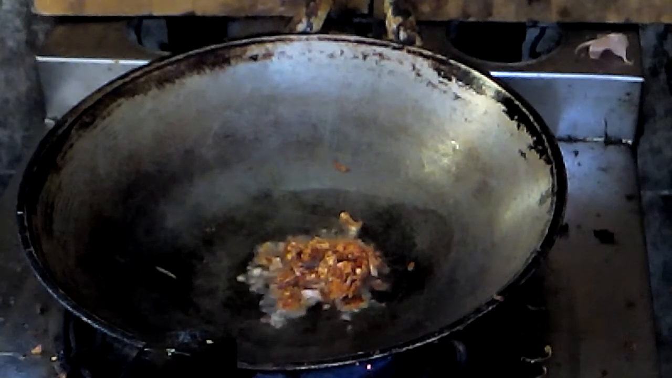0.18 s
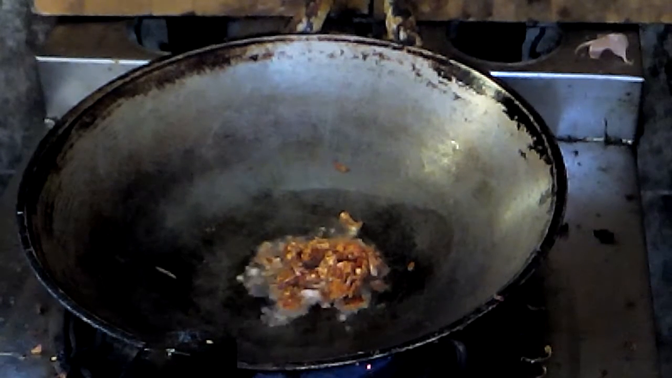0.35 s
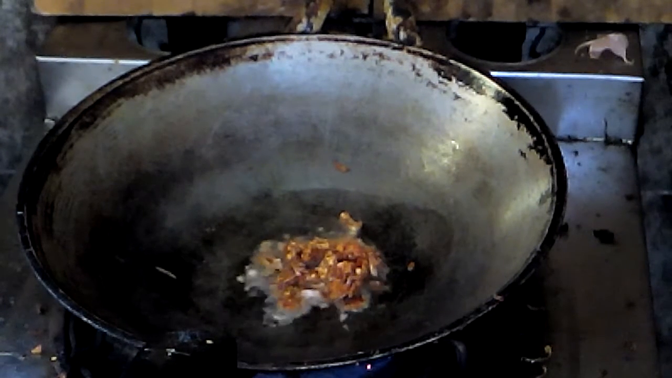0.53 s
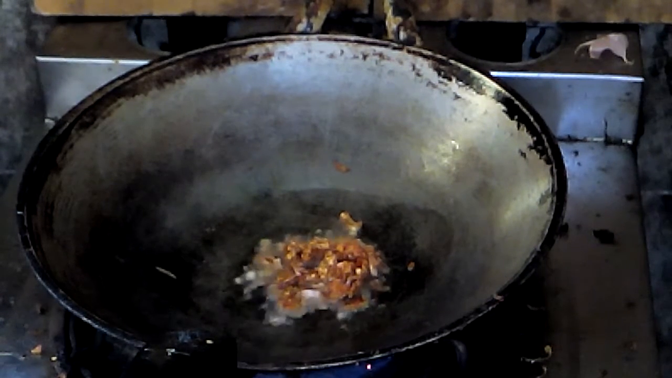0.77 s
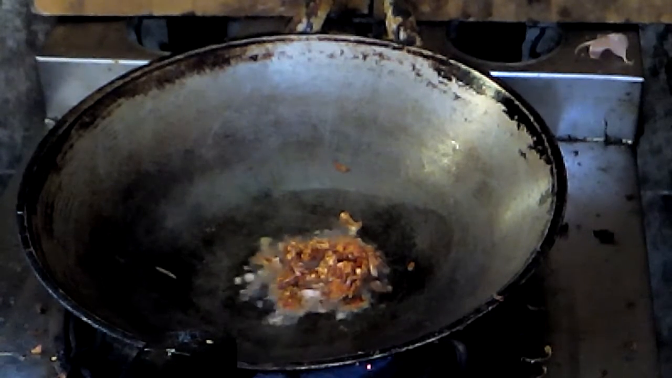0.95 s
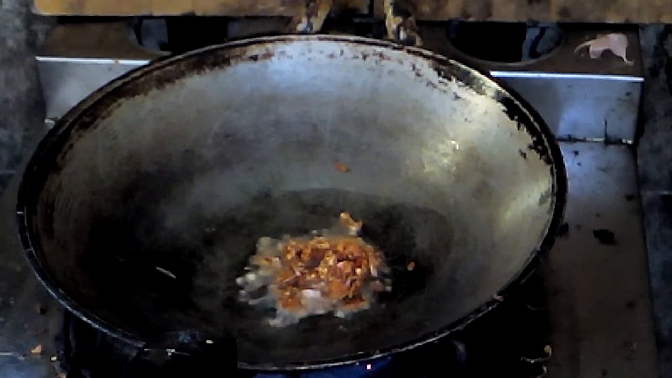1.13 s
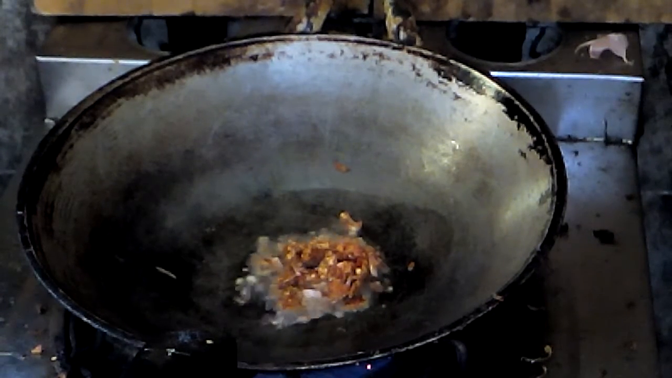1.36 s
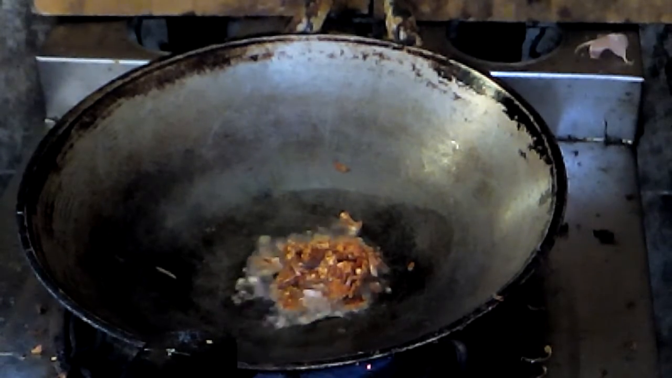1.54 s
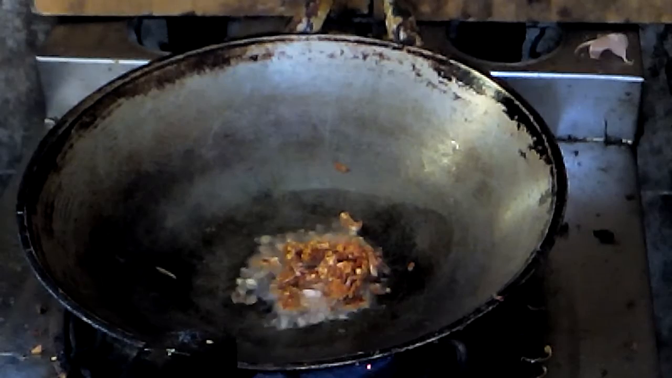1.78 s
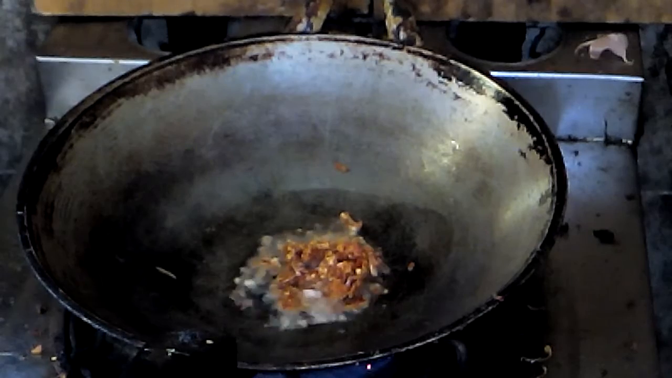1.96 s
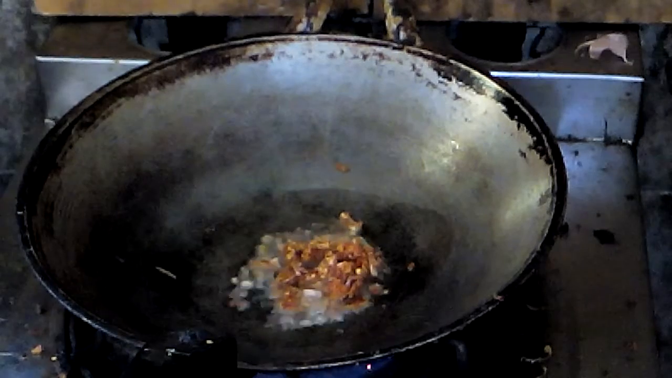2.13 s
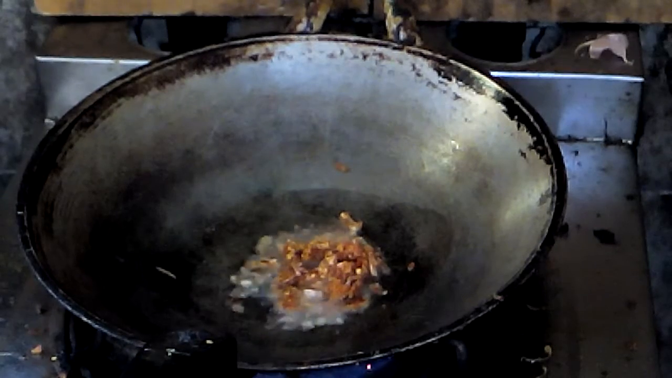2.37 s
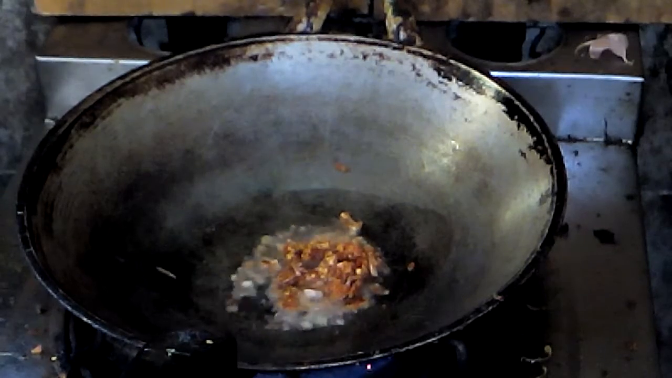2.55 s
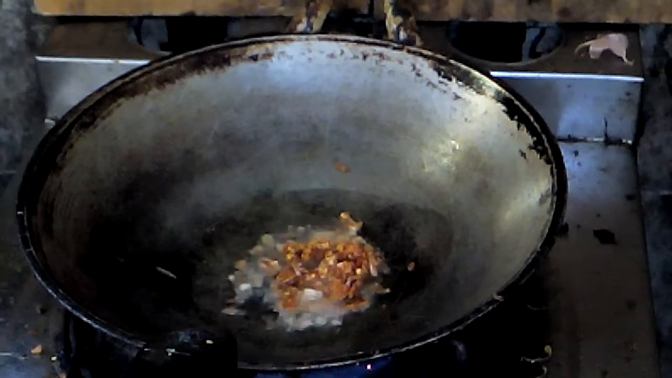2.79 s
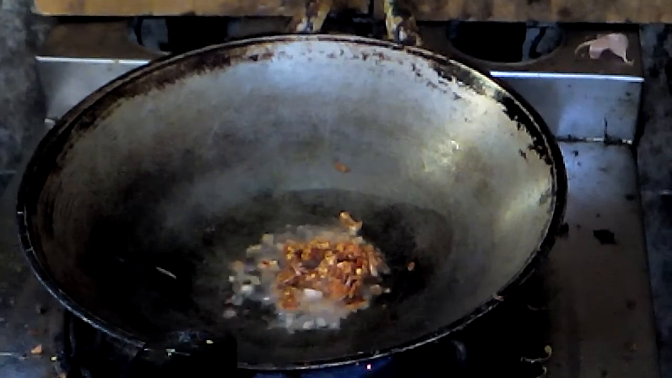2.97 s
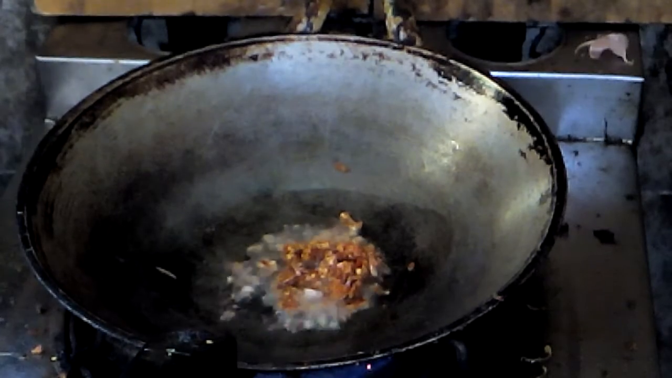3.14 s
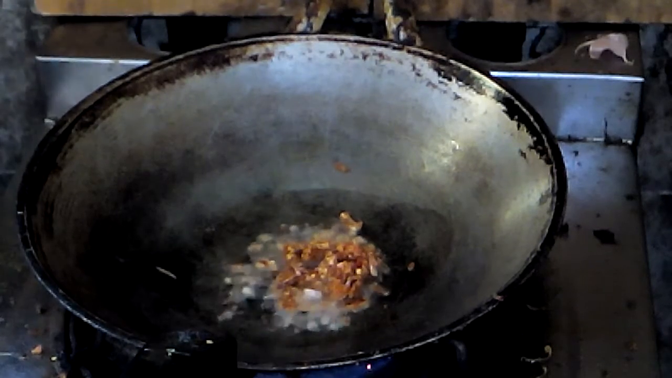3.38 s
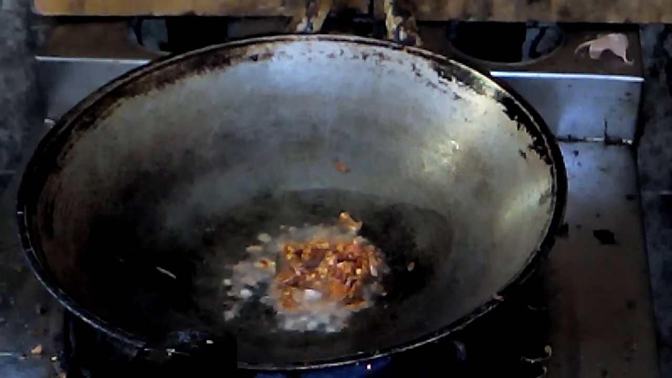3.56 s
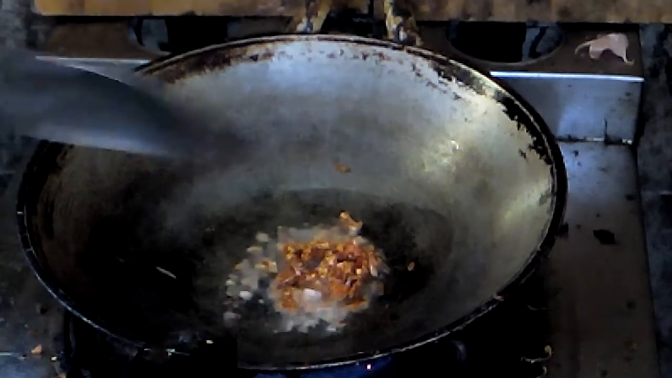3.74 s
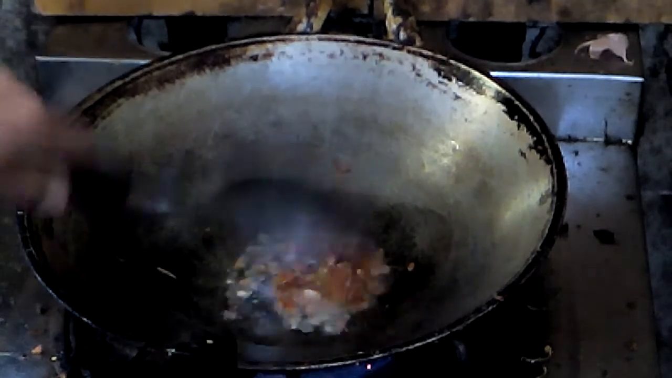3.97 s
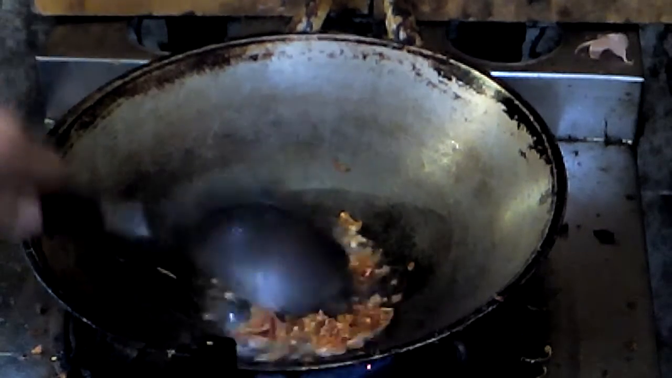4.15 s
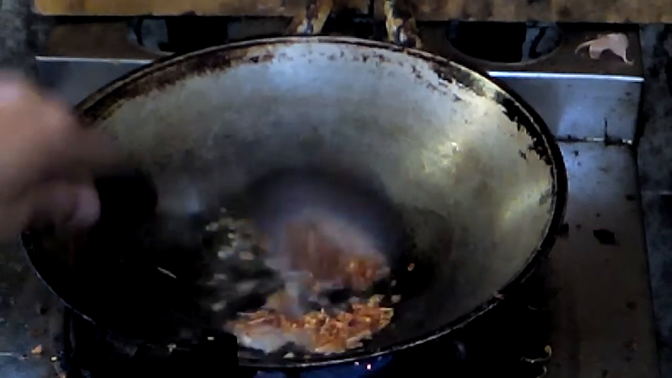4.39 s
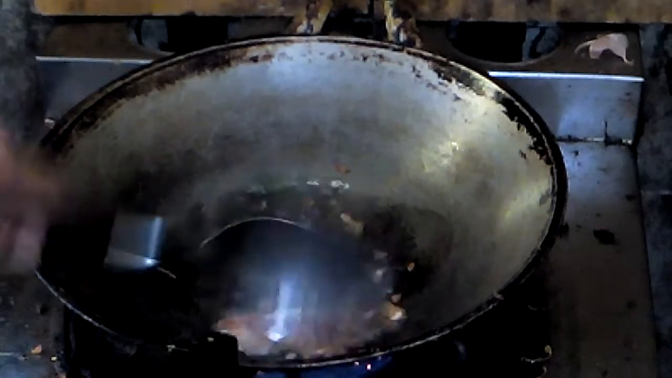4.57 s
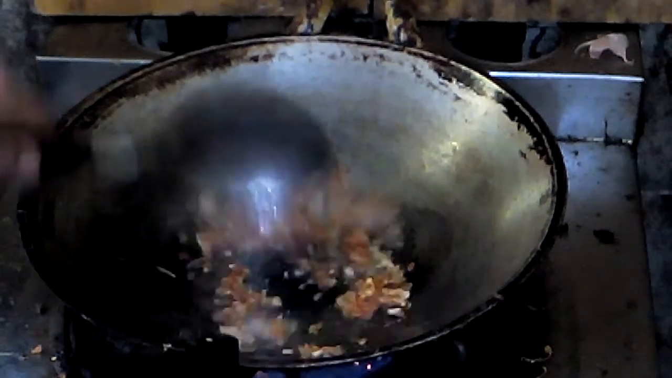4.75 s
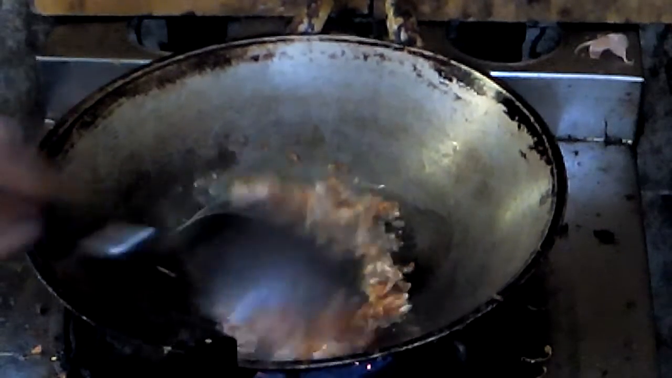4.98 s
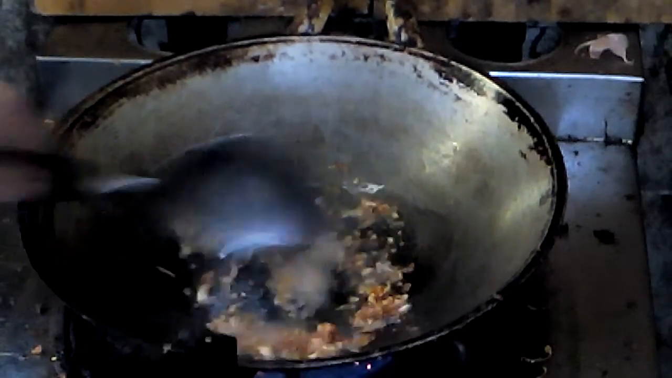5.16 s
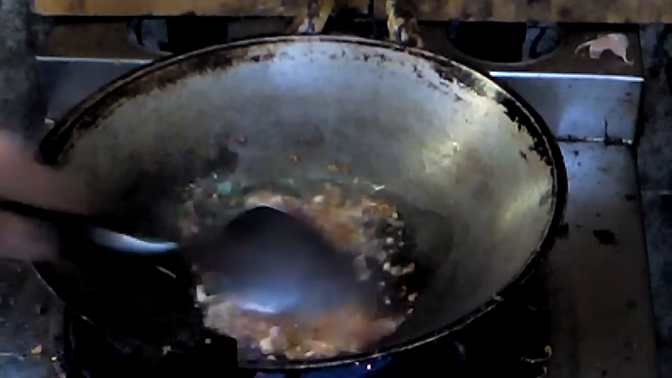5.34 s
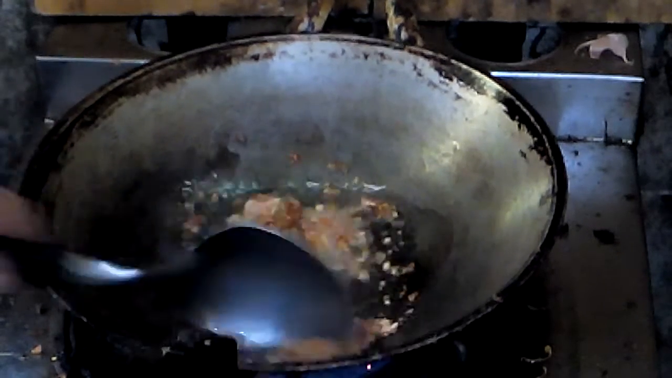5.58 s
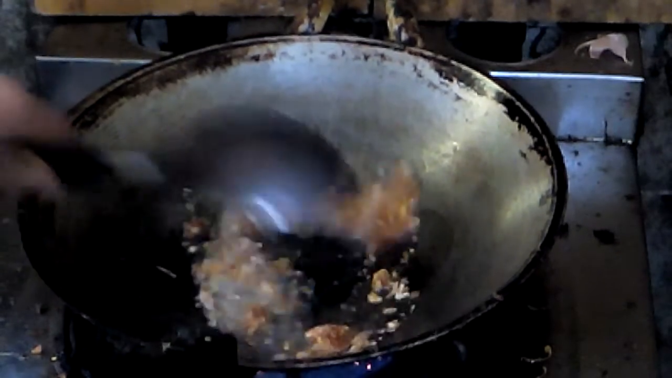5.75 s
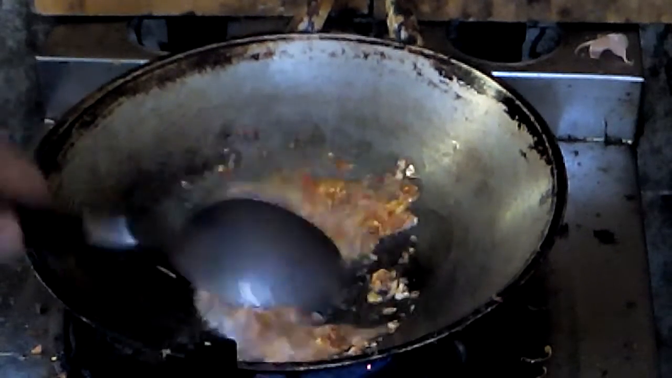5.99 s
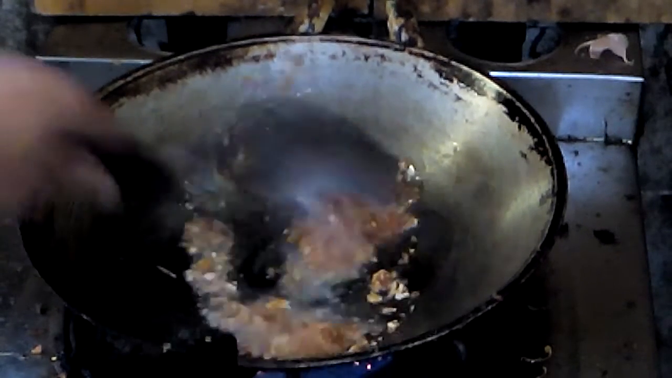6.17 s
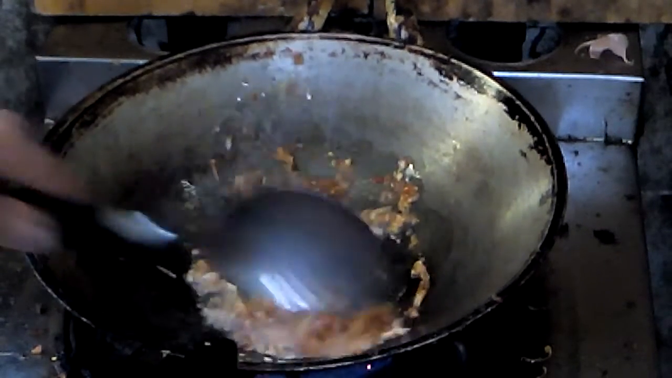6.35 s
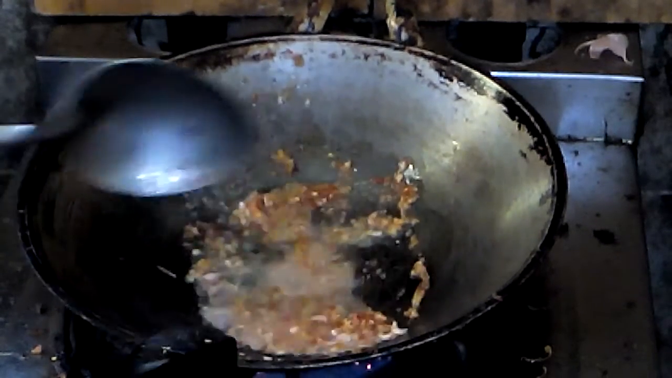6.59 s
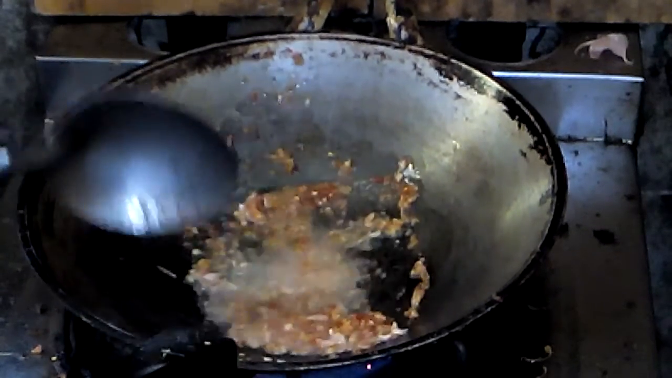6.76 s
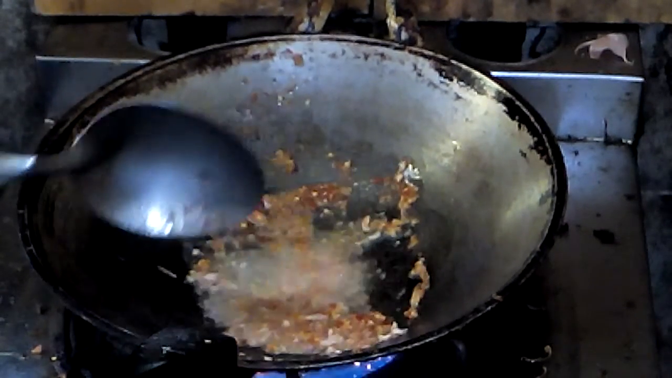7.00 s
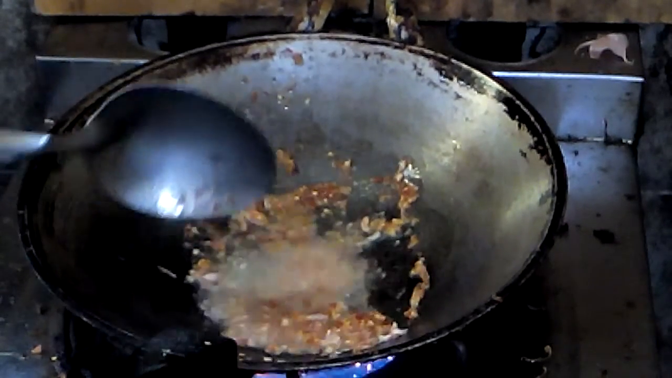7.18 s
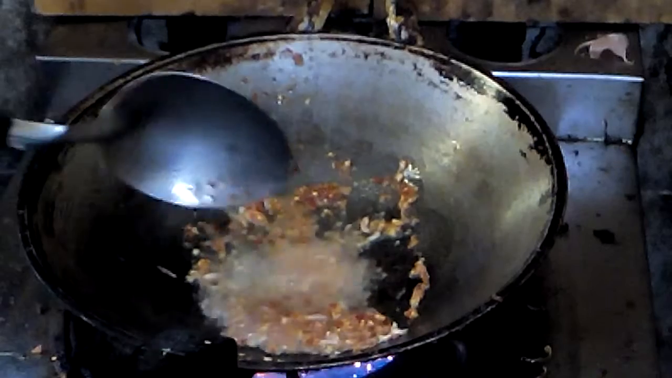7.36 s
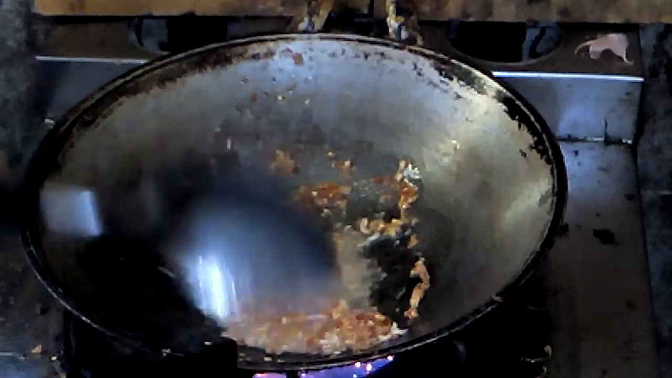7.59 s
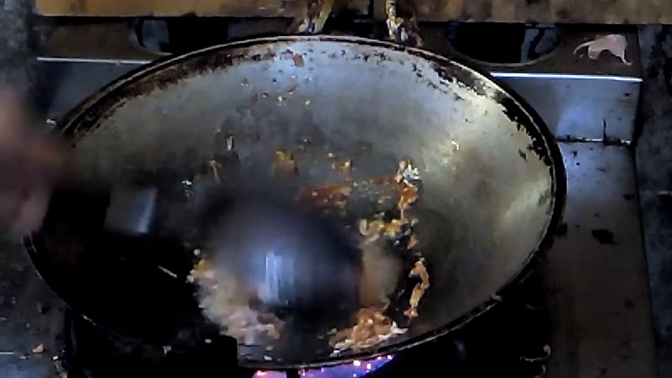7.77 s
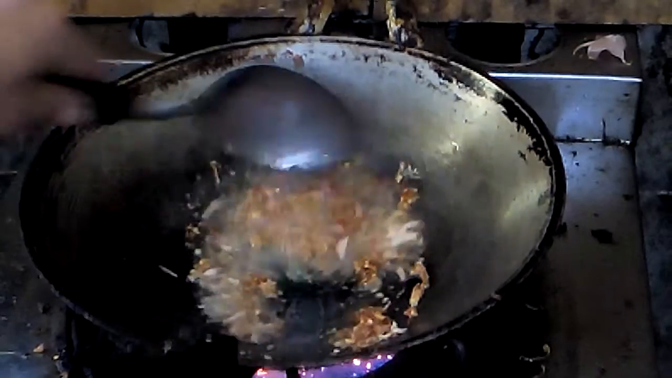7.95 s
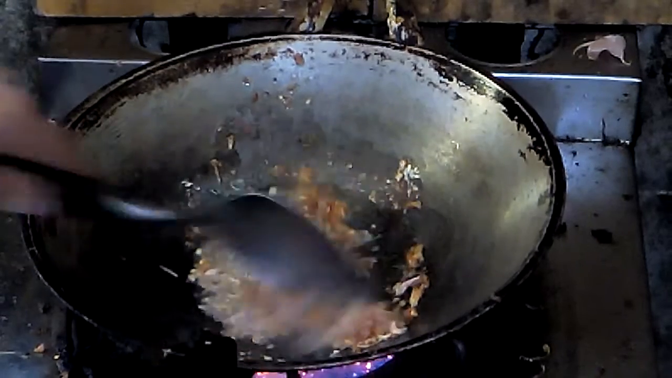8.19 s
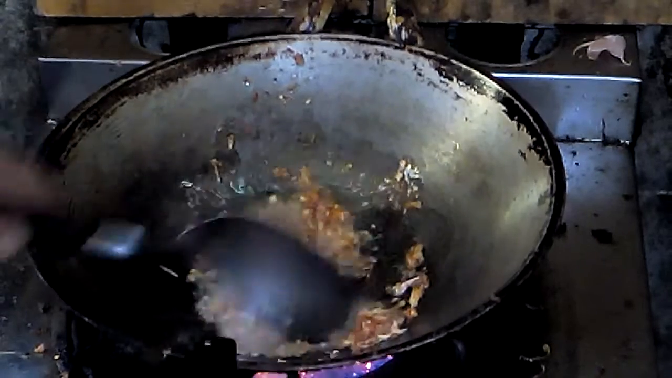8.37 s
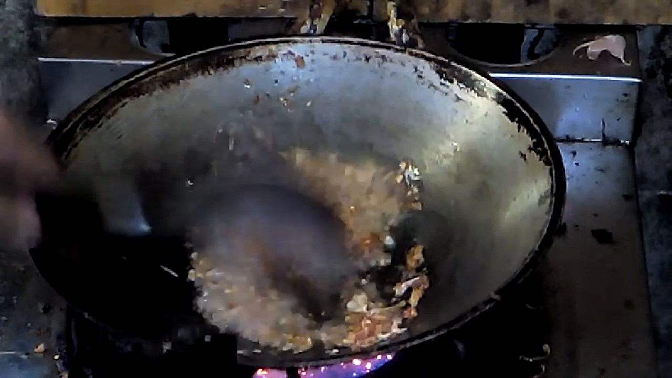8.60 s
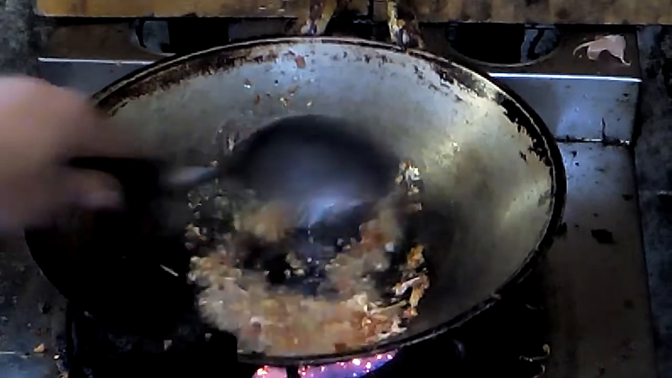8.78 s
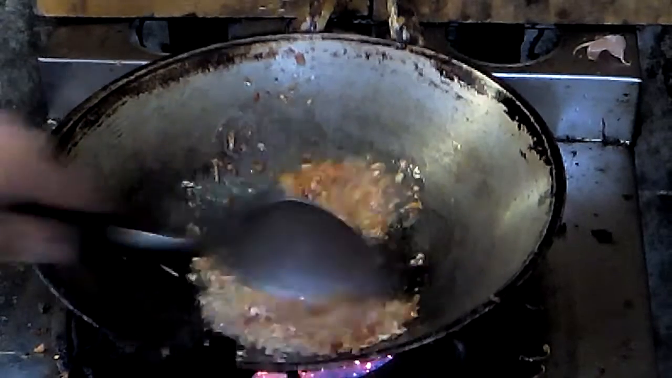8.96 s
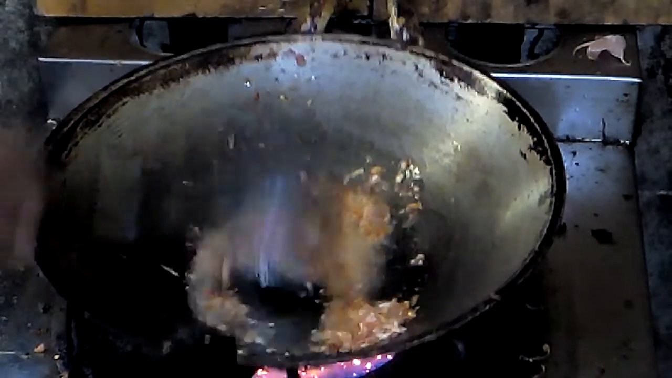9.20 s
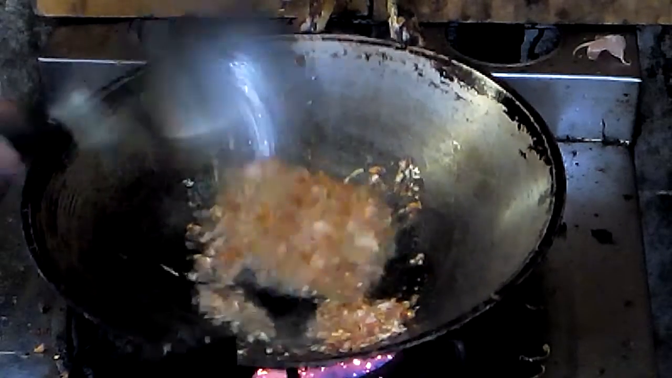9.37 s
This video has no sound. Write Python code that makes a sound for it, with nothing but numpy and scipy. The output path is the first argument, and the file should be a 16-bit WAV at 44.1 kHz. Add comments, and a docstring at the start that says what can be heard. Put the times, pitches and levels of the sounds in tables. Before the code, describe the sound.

A spoon taps and scrapes a bowl, oil sizzles softly, then a metal ladle clangs and scrapes around a steel wok as paste fries harder.

```python
"""Stirring paste in a wok

Close by, a spoon taps and scrapes a bowl, then knocks and drags on a steel wok while oil sizzles and spits.
Blows ring decaying modes over a rattle with brief wall echoes; strokes drive modes with gritty noise.
Steam bubbles are grainy noise. Burner and room give an unsteady rumble and a wavering drone in narrow
bands; far knocks are noise bursts, and rustles are faint broad swells."""
import sys
import numpy as np
from scipy import signal
from scipy.fft import rfft, irfft, next_fast_len
from scipy.io import wavfile
from scipy.ndimage import map_coordinates

SR = 44100
rng = np.random.default_rng(int(sys.argv[2]) if len(sys.argv) > 2 else 0)


def master(y):
    """Save y as 16-bit WAV."""
    cut = np.clip(np.atleast_2d(y).T, -1, 1)
    pcm = np.round(cut * 32767)  # scale
    wavfile.write(sys.argv[1], SR, pcm.astype(np.int16))


N = 415863
STEP = 64  # samples between control values


def amp(db):
    """Gain of a dB value."""
    return 10 ** (np.asarray(db) / 20)


def unit(x):
    """x at rms 1."""
    return x / np.sqrt(np.mean(x ** 2) + 1e-20)


def along(points, hz):
    """Value at hz from (Hz, value) points on a log axis."""
    point_hz, values = np.transpose(points)
    return np.interp(np.log(hz + 1), np.log(point_hz + 1), values)


def curve(points):
    """(s, value) points, one value per sample."""
    return np.interp(np.arange(N) / SR, *np.transpose(points))


def wobble(rate_hz):
    """Smooth random curve with rate_hz knots a second."""
    knots = rng.standard_normal(int(N * rate_hz / SR) + 4)
    positions = np.arange(0, N + STEP, STEP) * rate_hz / SR
    return map_coordinates(knots, [positions]).repeat(STEP)[:N]


def filtered(x, response):
    """x times a response of frequency."""
    size = next_fast_len(len(x) + 8192)
    return irfft(rfft(x, size) * response(np.fft.rfftfreq(size, 1 / SR)), size)[:len(x)]


def hiss(spectrum, grain_db):
    """Coloured noise of rms 1; grain_db scatters the size of its tiny impacts."""
    sizes = amp(grain_db * np.minimum(rng.exponential(size=N), 5))
    grains = rng.standard_normal(N) * sizes
    return unit(filtered(grains, lambda hz: amp(along(spectrum, hz))))


def narrow(peaks):
    """Noise of rms 1 inside narrow peaks."""
    def response(hz):
        return sum(amp(db) / (1 + ((hz - centre) / width * 2) ** 2) for centre, width, db in peaks)
    return unit(filtered(rng.standard_normal(N), response))


def dying(t60s, length):
    """Noise of energy 1 whose every frequency dies at its own speed."""
    hz, t, spectra = signal.stft(rng.standard_normal(length), SR, nperseg=128)
    decay = amp(-60 * t / along(t60s, hz)[:, None])
    tail = signal.istft(spectra * decay, SR, nperseg=128)[1][:length]
    return tail / np.linalg.norm(tail)


def swells(peaks_s, rises_s, dbs, fall_db_per_s):
    """Level in dB of each stroke (rows) per control step: it climbs 20 dB in its rise, then dies away."""
    late = np.arange(0, N + STEP, STEP) / SR - np.asarray(peaks_s)[:, None]
    climb = 20 * late / np.asarray(rises_s)[:, None]
    return np.asarray(dbs)[:, None] + np.where(late < 0, climb, -fall_db_per_s * late)


def together(levels_db):
    """Gain per sample of overlapping strokes, added by energy."""
    gain = np.sqrt((amp(levels_db) ** 2).sum(axis=0))
    return np.interp(np.arange(N), np.arange(len(gain)) * STEP, gain)


def drag(strokes, bands_db, falls, edges_hz, modes, rasp, rings_db, shift_db, favour_db_per_octave, rate_hz):
    """Grit under the spoon drives each mode; the moving contact favours now one mode, now another."""
    peaks, rises, *_, lower, upper = np.transpose(strokes)
    loudest = swells(peaks, rises, np.max(bands_db, axis=0), falls[0]).argmax(axis=0)
    favoured_hz = np.array([lower[loudest], upper[loudest]])
    grit = hiss(rasp, grain_db=1.5) * amp(1.2 * wobble(40))
    out = np.zeros(N)
    for db, fall, ring_db, lo, hi in zip(bands_db, falls, rings_db, edges_hz, edges_hz[1:]):
        broad = unit(filtered(grit, lambda hz: (hz >= lo) & (hz < hi)))
        gains, tones = [], []
        for hz, width_hz, level_db in modes:
            if not lo <= hz < hi:
                continue
            octaves = np.abs(np.log2(favoured_hz / hz)).min(axis=0)
            off = np.minimum(octaves, .2).repeat(STEP)[:N]
            gains.append(amp(level_db - favour_db_per_octave * off + shift_db * wobble(rate_hz)))
            resonator = signal.iirpeak(hz, hz / width_hz, SR)
            tones.append(unit(signal.lfilter(*resonator, rng.standard_normal(N))))
        total = np.sqrt(sum(g ** 2 for g in gains))  # the contact shares out a fixed energy
        rings = sum(tone * g for tone, g in zip(tones, gains))
        texture = unit(broad + amp(ring_db) * rings / total)
        out += together(swells(peaks, rises, db, fall)) * texture
    return out


def minimum_phase(colour):
    """Causal impulse response of (Hz, dB) points, by folding the cepstrum."""
    size = 8192
    cepstrum = irfft(np.log(amp(along(colour, np.fft.rfftfreq(size, 1 / SR)))))
    fold = np.r_[1, np.full(size // 2 - 1, 2), 1, np.zeros(size // 2 - 1)]
    return irfft(np.exp(rfft(cepstrum * fold)))[:size // 4]


def strike(events, high_db, high_per_low, modes, rattle_db, crack_db, crack_t60_s, gain_db):
    """Each blow rings the modes at new strengths, over a dense rattle of unresolved modes and wall echoes."""
    # rattle and wall decay before the spoon's damping: (frequency [Hz], t60 [s])
    walls = [(150, 1), (600, 0.37), (2500, 0.45), (8000, 0.34)]
    # centres of the colour bands, lows to highs: (frequency [Hz])
    bands_hz = [500, 1250, 2800, 6200]
    travel_s = .002  # steel to microphone
    out, t = np.zeros(N + SR), np.arange(SR // 2) / SR
    for s, db, share, favoured_hz, low_db, middle_db in events:
        ring = np.zeros(len(t))
        for hz, level_db, t60_s in modes:
            # the spot struck favours one mode
            near_db = 7.5 * np.exp(-(np.log2(hz / favoured_hz) / 0.038) ** 2)
            gain = amp(level_db + near_db + rng.normal(0, 3.3) - 60 * t / t60_s)
            ring += gain * np.sin(2 * np.pi * hz * t)
        rattle = amp(rattle_db) * dying(walls, len(t))
        crack = amp(crack_db - 60 * t / crack_t60_s) * rng.standard_normal(len(t))
        damping = amp(-60 * t / .2 * (1 / np.clip(share, .2, 1.5) - 1))
        blow = (ring / np.linalg.norm(ring) + rattle) * damping + crack
        bands = [low_db, 0, middle_db, middle_db + high_db + high_per_low * low_db]
        lows = [(25, low_db - 60), (80, low_db - 25), (250, low_db - 3)]
        highs = [(7500, bands[-1] - 3), (8800, bands[-1] - 24)]
        colour = [*lows, *zip(bands_hz, bands), *highs]
        blow = signal.fftconvolve(blow, minimum_phase(colour))[:len(t)]
        onset = 1 - np.exp(-t / 0.00093)
        out[round((s + travel_s) * SR):][:len(t)] += amp(db + gain_db) * blow * onset
    return out[:N]


def pips(events, spread, t60_s, gain_db):
    """Short bursts of noise about one pitch; spread is in natural-log frequency."""
    out, t = np.zeros(N + SR), np.arange(SR // 4) / SR
    for s, db, hz in events:
        noise = filtered(rng.standard_normal(len(t)), lambda f: np.exp(-(np.log((f + 1) / hz) / spread) ** 2))
        envelope = amp(db + gain_db - 60 * t / t60_s) * (1 - np.exp(-t / 0.00091))
        out[round(s * SR):][:len(t)] += envelope * unit(noise)
    return out[:N]


def bowl():
    """The spoon taps and scrapes the bowl; many minor modes crowd between the main ones."""
    # light bright strokes between pressed ones: (peak time [s], rise by 20 dB [s], low level [dB],
    # body level [dB], treble level [dB], lower favoured pitch [Hz], upper favoured pitch [Hz])
    bowl_strokes = [(0.024, 0.019, -45, -52, -36.5, 1980, 3710),
                    (0.106, 0.15, -50, -39.5, -41.5, 1260, 3500),
                    (0.135, .04, -55, -41.5, -34.5, 1990, 3680), (0.235, 0.093, -38, -19, -27, 1150, 3070),
                    (0.285, 0.12, -45, -28, -36, 1190, 2970), (0.402, 0.032, -45, -46.5, -33.5, 2020, 2870),
                    (0.531, 0.17, -46, -35, -28, 1320, 3950), (0.603, 0.077, -34.5, -19.5, -25, 1284, 3390),
                    (0.768, 0.013, -51, -50, -36.5, 1760, 3550),
                    (0.866, 0.14, -49, -41.5, -37.5, 1290, 3320), (0.928, 0.13, -46, -30, -32, 1450, 2700),
                    (0.98, 0.11, -47, -24, -34.5, 1160, 2020), (1.065, .02, -51, -43, -40.5, 1175, 3740),
                    (1.112, 0.061, -64, -45, -35.5, 2110, 2700),
                    (1.216, 0.058, -62, -49, -36.5, 1760, 3260),
                    (1.255, 0.088, -53, -45, -35.5, 1770, 3240),
                    (1.294, 0.089, -44, -32.5, -40.5, 1180, 3260),
                    (1.433, 0.01, -56, -59.5, -43.5, 1930, 3990), (1.503, 0.11, -55, -42, -37, 1560, 4180),
                    (1.57, 0.14, -57, -57, -47.5, 1500, 2800), (2.39, .03, -66, -59, -64, 1360, 4630),
                    (2.46, .1, -61, -59.5, -60, 1220, 3830), (2.528, .06, -68, -65, -53.5, 1560, 5000),
                    (2.636, 0.12, -66, -63, -62.5, 1260, 3910), (2.7, .1, -65, -63.5, -68, 1310, 3640)]
    # bowl modes: (frequency [Hz], width when dragged [Hz], relative level [dB])
    bowl_modes = [(529.3, 16, -8), (907, 31, -5), (1146.4, 25, -4), (1190, 53, -8), (1286, 40, -2),
                  (1556, 85, -5.5), (1720, 29, -22), (1850, 36, -8), (2026, 35, -5), (2110, 47, -7),
                  (2410, 30, -9), (2700, 50, -10), (3256, 42, -15), (3440, 20, -18), (3750, 40, -19.5),
                  (4200, 43, -10), (4620, 35, -19), (4980, 66, -8), (5220, 35, -16), (5560, 60, -22),
                  (6170, 40, -9.5), (6340, 60, -20), (7300, 73, -11.5), (7170, 32, -5.5), (7150, 77, -9.5),
                  (9030, 60, -8), (8630, 60, -28)]
    # scraping grit spectrum: (frequency [Hz], relative level [dB])
    bowl_rasp = [(59, -67), (100, -30), (182, -5), (260, -12), (520, -15.5), (815, -41), (1250, -7),
                 (1380, -16), (5720, -16), (7300, -10), (8800, -57.5), (11400, -76), (19400, -120)]
    # stroke decay, lows to edge hiss: (fall [dB/s])
    bowl_falls = [160, 203, 240, 270]
    # taps: (time [s], relative clang level [dB], share of full ring time [1], favoured pitch [Hz],
    # lows over the clang [dB], middle over the clang [dB])
    taps = [(0.017, -36, 0.96, 540, 6.5, 8.5), (0.203, -17, .98, 1200, -20.5, 0.4),
            (0.385, -45, 0.86, 2170, 4, 13.5), (0.573, -12.5, 0.87, 1300, -19.5, -7),
            (0.759, -36, 0.83, 3450, -4, 8.5), (0.914, -19, 0.6, 1164, -18.5, -3),
            (1.209, -57, 0.95, 3240, 1.2, 18), (1.423, -46, 1, 1940, 6, 0.4),
            (1.708, -36, 0.84, 1840, 3.5, 8)]

    minor = [(2000 + 6000 * u, 45, -11 - 4 * u) for u in rng.random(size=18)]
    _, _, low_db, body_db, treble_db, _, _ = np.transpose(bowl_strokes)
    edge_db = treble_db - 4 - 0.36 * (body_db - treble_db)  # less edge hiss where the body outweighs the treble
    strokes = drag(bowl_strokes, [low_db, body_db, treble_db, edge_db], bowl_falls,
                   edges_hz=[0, 1000, 1790, 4500, SR], modes=bowl_modes + minor, rasp=bowl_rasp,
                   rings_db=[4, 4, 4.4, 3.0], shift_db=10.0, favour_db_per_octave=51.5, rate_hz=16)
    ringing = [(hz, db, 1.6 / width_hz + 0.2) for hz, width_hz, db in bowl_modes]
    # taps with little low end are also duller
    return strokes + strike(taps, high_db=-0.1, high_per_low=0.45, modes=ringing, rattle_db=2.5,
                            crack_db=-22.5, crack_t60_s=0.011, gain_db=28)


def kitchen():
    """A low unsteady rumble in the room's modes, a wavering drone and far knocks."""
    # burner and room spectrum: (frequency [Hz], relative level [dB])
    hum_spectrum = [(12, -68.5), (20, -34.5), (27, -32.5), (30, -47), (43, -3), (138, -4.5), (172, -7),
                    (198, 2.5), (217, -9), (439, -11), (489, -13.5), (1010, -16), (1080, -20.5),
                    (1160, -23.5), (1500, -18.5), (1950, -40.5), (3300, -120)]
    # low room modes: (frequency [Hz], width [Hz], relative level [dB])
    boom_peaks = [(61, 11, -5.5), (80, 16, -10), (101.2, 10, -3), (204, 6.3, -10), (252, 42, -14)]
    # rumble course before wobble: (time [s], relative level [dB])
    rumble_points = [(0, -64.5), (1.5, -62.5), (2.1, -64.5), (4.6, -64.5), (5.0, -59.5), (6.8, -63.5),
                     (8.0, -62), (9.43, -59.5)]
    # drone band: (frequency [Hz], width [Hz], relative level [dB])
    drone_peaks = [(168.3, 8.3, 0)]
    # drone course before wobble: (time [s], level [dB])
    drone_points = [(0, -64), (1.6, -72), (2.3, -63), (3.3, -66), (3.7, -59), (6.5, -60), (7.3, -57.5),
                    (9.43, -65.5)]
    # small knocks further off: (time [s], relative level [dB], pitch [Hz])
    far_knocks = [(2.525, -45, 2700), (3.473, -42.5, 500), (3.518, -43, 1690)]

    noise = amp(6) * hiss(hum_spectrum, grain_db=0.5) + amp(1.0) * narrow(boom_peaks)
    rumble = amp(curve(rumble_points) + 0.97 * wobble(2.6)) * noise
    drone = amp(curve(drone_points) + 2.7 * wobble(3.5)) * narrow(drone_peaks)
    return rumble + drone + pips(far_knocks, spread=0.57, t60_s=0.27, gain_db=-7.5)


def oil():
    """Countless steam bubbles burst in the oil, with a few louder spits."""
    # sizzle course before wobble, the stirred paste fries harder: (time [s], level [dB])
    sizzle_points = [(0, -61), (1.95, -59), (4.12, -59), (4.24, -53.5), (4.4, -45.5), (5.37, -41),
                     (5.75, -43.5), (6.35, -43.5), (7.03, -47.5), (7.47, -49), (8.2, -47.5), (8.4, -48),
                     (8.7, -47), (9.43, -51.5)]
    # bubble noise spectrum: (frequency [Hz], relative level [dB])
    fizz = [(180, -24.5), (300, 0.5), (371, -30), (446, -3), (635, -15), (807, -13), (1090, -8), (1230, -4),
            (7020, 0.5), (7530, -3.5), (8800, -21), (11400, -56), (19400, -120)]
    # single spits: (time [s], relative level [dB], pitch [Hz])
    spits = [(1.8682, -43, 4080), (2.3894, -48, 5040), (2.5328, -33, 4980), (2.7767, -34.5, 5300),
             (3.2515, -41, 4610), (7.26, -35.5, 6600)]

    level_db = curve(sizzle_points) + 0.35 * wobble(4.4) + 1.1 * wobble(45)
    return amp(level_db) * hiss(fizz, grain_db=1.5) + pips(spits, spread=0.18, t60_s=0.21, gain_db=-9)


def singing():
    """The dragged spoon briefly makes one mode of bowl or wok sing: short swelling sines."""
    # tones: (start [s], length [s], peak level [dB], frequency [Hz])
    tones = [(.02, 0.065, -36, 537), (0.123, .05, -36, 1990), (0.384, 0.055, -30, 7400),
             (.48, 0.12, -33.5, 4210), (.48, 0.09, -39, 3470), (0.757, 0.023, -33, 3450),
             (.92, 0.077, -28.5, 2010), (1.083, 0.078, -41, 2630), (1.076, .06, -45, 4950),
             (1.205, 0.052, -38, 3320), (1.42, .04, -41.5, 1960), (2.6, .13, -61.5, 1304),
             (2.597, 0.12, -64, 933), (5.05, 0.059, -33.5, 544), (5.282, .11, -41.5, 1590),
             (6.24, 0.071, -41, 2500), (6.39, 0.07, -42, 1600), (8.183, 0.1, -29.5, 1209),
             (9.03, 0.14, -34, 795)]
    out = np.zeros(N)
    for s, length_s, db, hz in tones:
        t = np.arange(round(length_s * SR)) / SR
        swell = np.sin(np.pi * np.sqrt(t / length_s)) ** 2  # peaks at a quarter of the length
        out[round(s * SR):][:len(t)] += amp(db) * swell * np.sin(2 * np.pi * (hz * t + rng.random()))
    return out


def rustles():
    """Brief broad swells of fine-grained noise."""
    # faint rustles: (peak time [s], rise by 20 dB [s], level [dB])
    rustle_swells = [(1.676, .02, -49.5), (2.248, 0.22, -48), (3.242, 0.2, -54), (3.724, 0.3, -57),
                     (6.734, 0.06, -43)]
    # rustle spectrum: (frequency [Hz], relative level [dB])
    rustle_spectrum = [(350, -35), (600, -4), (899, -13), (1330, -2), (5680, -5), (7440, -9), (8800, -30),
                       (11400, -63), (19400, -120)]
    levels_db = swells(*np.transpose(rustle_swells), fall_db_per_s=230)
    return together(levels_db) * hiss(rustle_spectrum, grain_db=3.0)


def wok():
    """The spoon knocks and scrapes the wok; under the pressed spoon the modes are broader."""
    # modes of wok and spoon: (frequency [Hz])
    wok_hz = [358, 543, 592, 717, 751, 795, 1093, 1155, 1209, 1263, 1400, 1451, 1542, 1598, 1765, 2050,
              2218, 2347, 2500, 2668, 2880, 2992, 3300, 3833, 4062, 4350, 4800, 5566, 6110, 6410]
    # the same modes: (relative level [dB], t60 before the spoon's damping [s])
    wok_modes = [(-10.5, 0.27), (-0.5, 0.16), (-9.5, 0.29), (-12.5, 0.4), (-3.5, .2), (-5, 0.18),
                 (-5, 0.18), (-5, 0.12), (-2, 0.15), (-6.5, 0.092), (-11.5, .28), (-9, 0.26), (-10, 0.15),
                 (-6, 0.17), (-9, 0.16), (-20, 0.16), (-14.5, 0.13), (-2.5, .16), (-4.5, 0.075),
                 (-11.5, 0.31), (-11, 0.3), (-8, 0.22), (-14, 0.22), (-7.5, 0.15), (-7.5, 0.25),
                 (-8.5, 0.22), (-4.5, 0.19), (-11, 0.27), (-12, 0.33), (-8.5, 0.23)]
    # drags: (peak time [s], rise by 20 dB [s], body level [dB], treble level [dB],
    # lower favoured pitch [Hz], upper favoured pitch [Hz])
    wok_strokes = [(4.17, 0.027, -56, -55, 600, 3410), (4.29, .02, -42.5, -48.5, 645, 3090),
                   (4.34, 0.091, -47, -45, 567, 3070), (4.42, 0.17, -62, -51, 565, 3570),
                   (4.49, .2, -68, -49, 447, 3650), (4.59, 0.064, -34.5, -36, 570, 3740),
                   (4.88, 0.082, -40, -45, 890, 3400), (5.006, 0.056, -47, -44.5, 339, 2760),
                   (5.068, .08, -37, -39.5, 593, 3260), (5.13, .2, -51, -45, 700, 3840),
                   (5.31, 0.067, -37.5, -36, 630, 2800), (5.44, 0.071, -39, -41.5, 550, 3100),
                   (5.515, 0.14, -32, -38.5, 593, 2400), (5.59, 0.11, -37.5, -43, 710, 3060),
                   (5.714, .15, -62, -46, 487, 3150), (5.8, 0.13, -47.5, -47, 500, 3530),
                   (5.872, .1, -39.5, -45.5, 554, 2830), (6.0, 0.18, -61, -48, 450, 3400),
                   (6.096, 0.06, -34.5, -33, 602, 2360), (6.268, .08, -46.5, -42.5, 641, 2450),
                   (6.32, .1, -41.5, -55, 530, 3360), (6.461, 0.21, -36.5, -38.5, 594, 3560),
                   (6.63, .1, -61, -46.5, 670, 3450), (6.754, 0.055, -45.5, -50, 884, 2420),
                   (6.87, 0.27, -68, -53.5, 565, 3680), (8.124, 0.026, -44, -55, 585, 2880),
                   (8.21, .03, -33.5, -39.5, 1274, 3400), (8.296, 0.11, -33, -39.5, 757, 3660),
                   (8.37, .2, -56, -45, 845, 2940), (8.71, 0.055, -44.5, -44, 407, 3170),
                   (8.776, 0.064, -36.5, -33.5, 700, 2950), (8.86, 0.17, -60, -52, 604, 3200),
                   (8.97, .05, -48, -48.5, 587, 2720), (9.074, .1, -34, -36, 757, 4080),
                   (9.23, .3, -61, -54, 450, 3250), (9.43, 0.022, -44, -43, 659, 2990)]
    # scraping grit spectrum: (frequency [Hz], relative level [dB])
    wok_rasp = [(29, -44), (50, -8), (141, -23), (195, -5.5), (350, -1.5), (454, -16.5), (529, 3),
                (685, -17), (780, -4), (969, -5), (1180, -15.5), (1340, -24.5), (2980, -10), (7090, -13),
                (8800, -32.5), (11400, -58.5), (19400, -120)]
    # stroke decay, body to edge hiss: (fall [dB/s])
    wok_falls = [245, 212, 170]
    # blows, dull where paste pads the spoon: (time [s], relative clang level [dB],
    # share of full ring time [1], favoured pitch [Hz], lows over the clang [dB], middle over the clang [dB])
    blows = [(4.153, -62, 1, 2990, 3, 12), (4.273, -40, 0.6, 1150, 11.5, 1),
             (4.518, -19.5, 0.93, 1210, 5, 0), (4.77, -7, 0.81, 1232, -5.5, -7.5),
             (4.988, -40.5, 0.4, 272, 8.5, 2), (5.19, -17.5, 0.83, 1130, -5, -14.5),
             (5.405, -50.5, 0.57, 543, 19, 3), (5.728, -42.5, 0.85, 516, 17, 2),
             (6.007, -53, 0.92, 285, 25.5, 13), (6.593, -43, 0.72, 2920, -20, 4),
             (7.82, -6.5, 0.96, 1210, -10.5, -7.5), (8.109, -46, 0.54, 526, 9, -8),
             (8.478, -6, 0.85, 1210, -6, -4.5), (8.695, -49, 0.79, 202, 26, 5),
             (8.947, -43.5, 0.83, 595, 4.5, -17), (9.262, -4.5, 0.87, 1237, -10, -5.5)]

    modes = [(hz, *rest) for hz, rest in zip(wok_hz, wok_modes)]
    damped = [(hz, 2.5 / t60_s + 6 + 0.011 * hz, db) for hz, db, t60_s in modes]
    _, _, body_db, treble_db, _, _ = np.transpose(wok_strokes)
    edge_db = -44 + 0.54 * (treble_db + 43.5)  # edge hiss swings less than the treble
    strokes = drag(wok_strokes, [body_db, treble_db, edge_db], wok_falls, edges_hz=[0, 1700, 4500, SR],
                   modes=damped, rasp=wok_rasp, rings_db=[4, -1.5, -8], shift_db=5.5,
                   favour_db_per_octave=66, rate_hz=12)
    # the heavier the lows, the duller
    return strokes + strike(blows, high_db=-3.5, high_per_low=-0.42, modes=modes, rattle_db=-1,
                            crack_db=-21, crack_t60_s=0.036, gain_db=28.5)


def scene():
    """All sources at one microphone."""
    return (bowl() + kitchen() + oil() + singing() + rustles() + wok())[None]


def record(dry):
    """The loudest peaks are squeezed, the treble rolls off and nothing is kept above the band limit."""
    # microphone roll-off: (frequency [Hz], level [dB])
    roll_off = [(8300, -1), (8900, -10), (9150, -34), (9300, -46.5)]
    top_hz = 9250
    soft = dry[0] / (1 + np.abs(dry[0] / .9) ** 6) ** (1 / 6)
    return filtered(soft, lambda hz: amp(along(roll_off, hz)) * (hz < top_hz))[None]


dry = scene()
out = record(dry)
master(out)
```